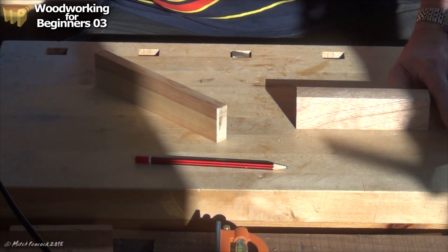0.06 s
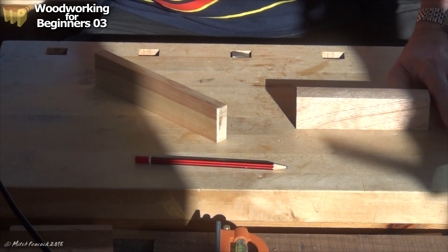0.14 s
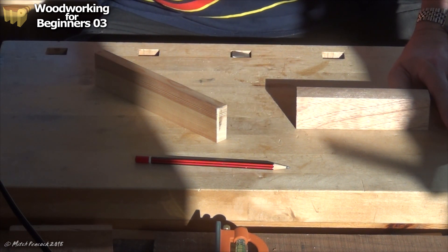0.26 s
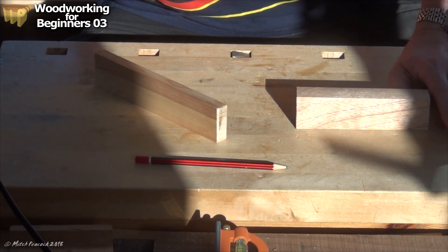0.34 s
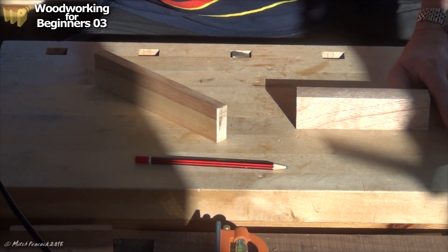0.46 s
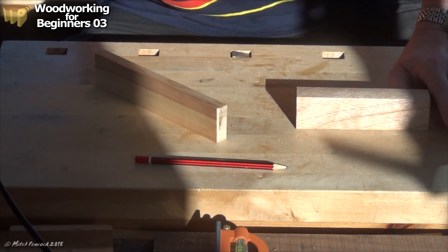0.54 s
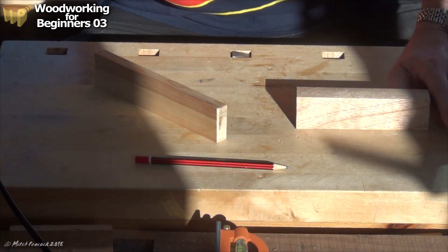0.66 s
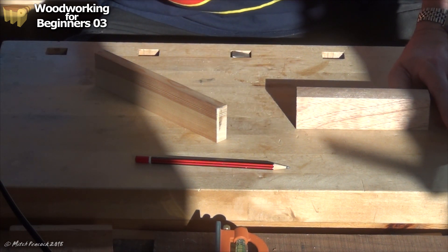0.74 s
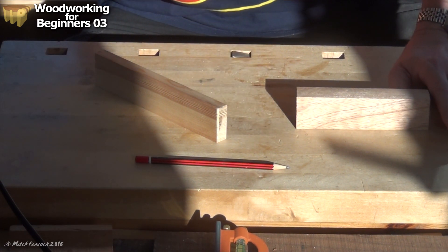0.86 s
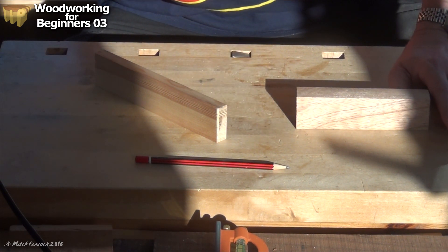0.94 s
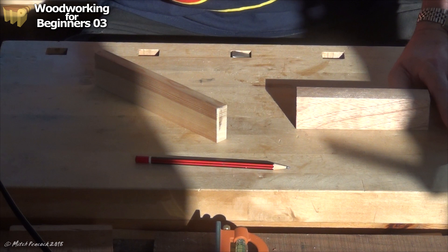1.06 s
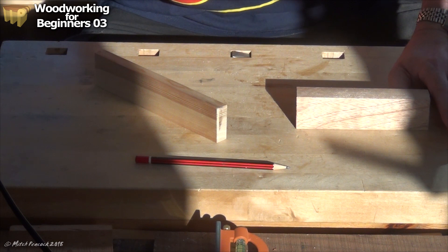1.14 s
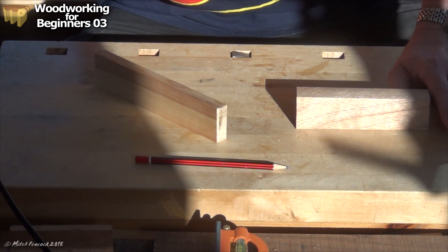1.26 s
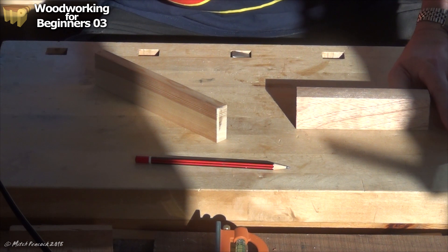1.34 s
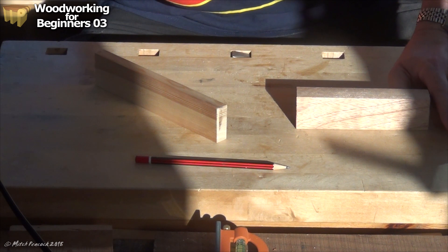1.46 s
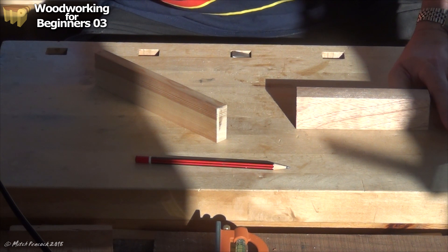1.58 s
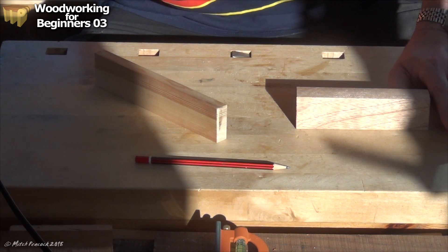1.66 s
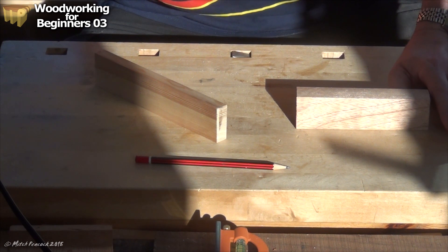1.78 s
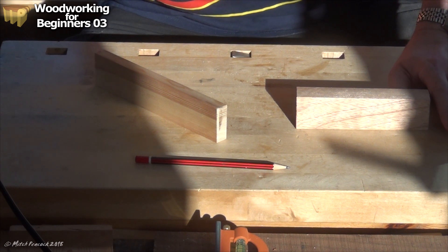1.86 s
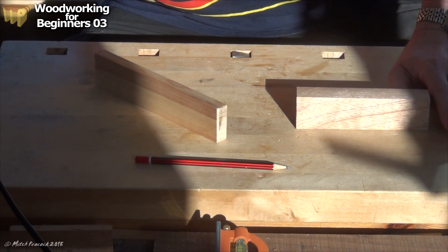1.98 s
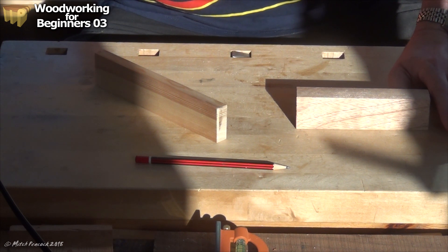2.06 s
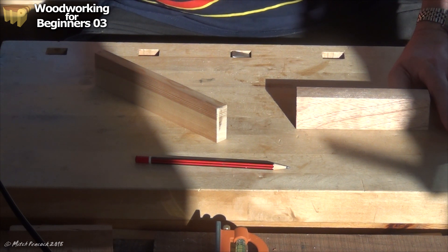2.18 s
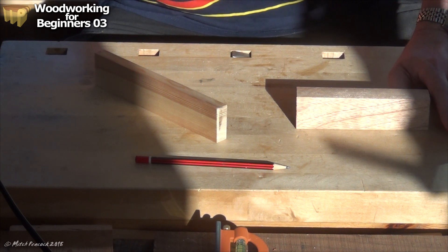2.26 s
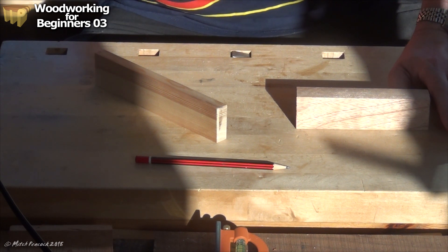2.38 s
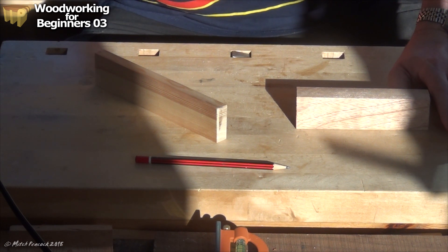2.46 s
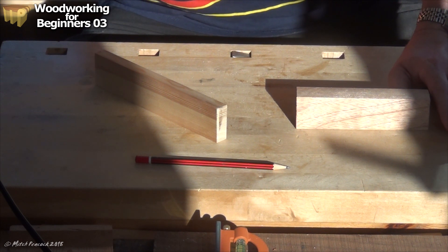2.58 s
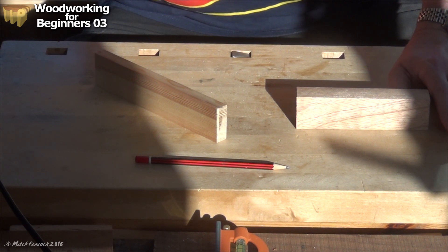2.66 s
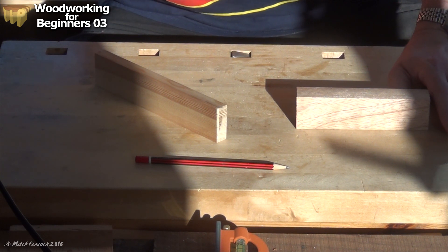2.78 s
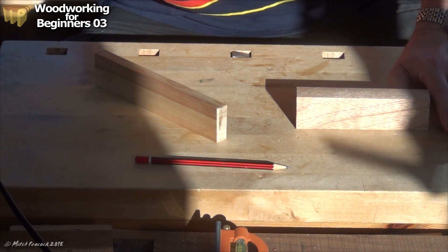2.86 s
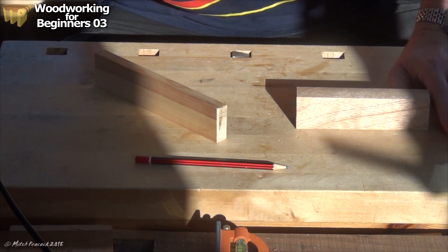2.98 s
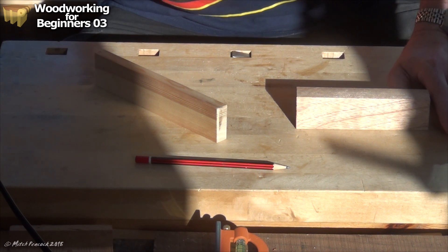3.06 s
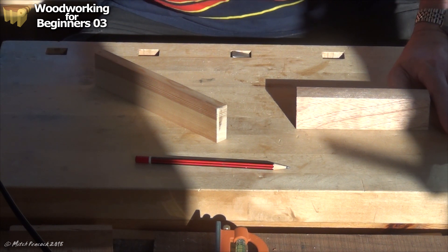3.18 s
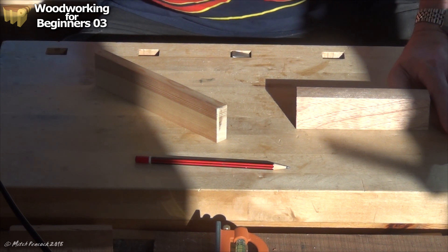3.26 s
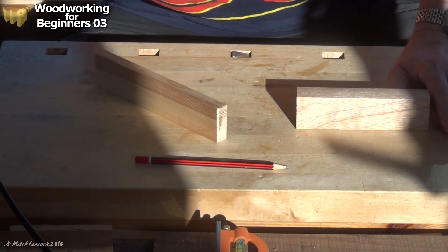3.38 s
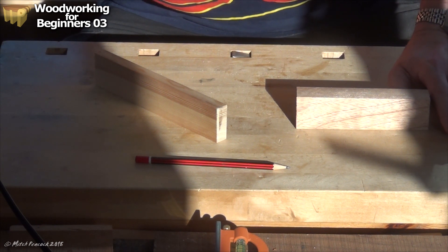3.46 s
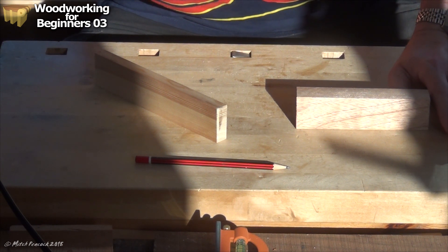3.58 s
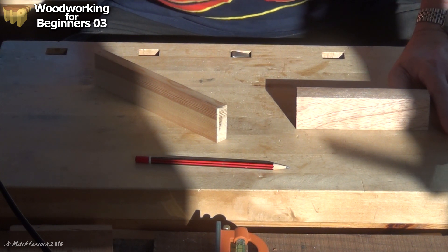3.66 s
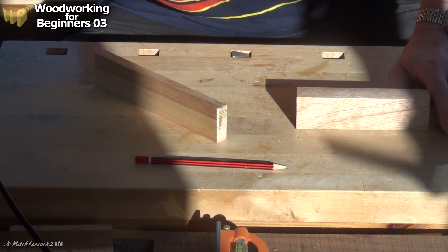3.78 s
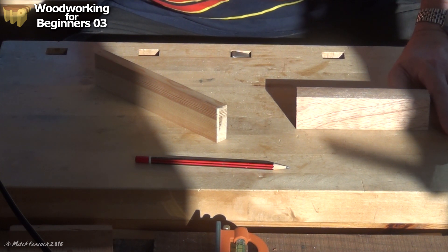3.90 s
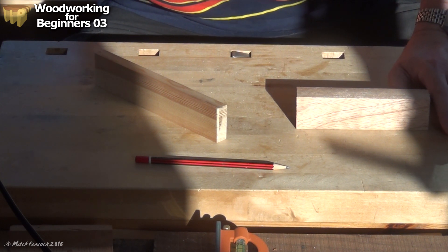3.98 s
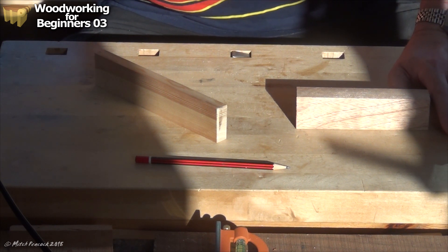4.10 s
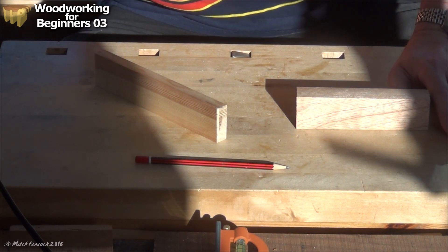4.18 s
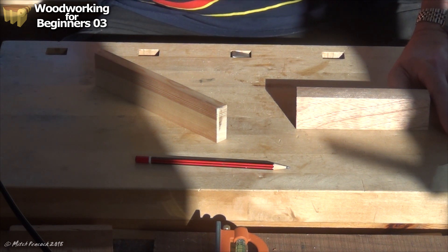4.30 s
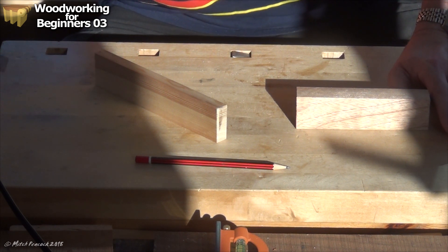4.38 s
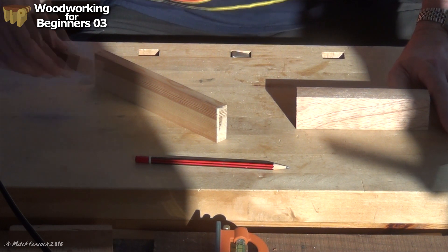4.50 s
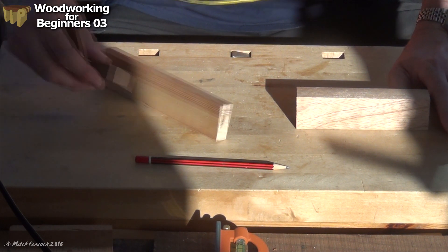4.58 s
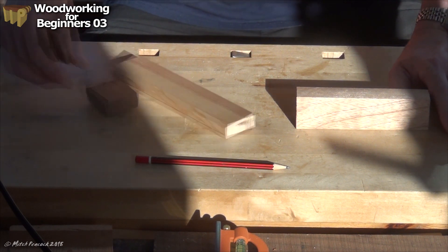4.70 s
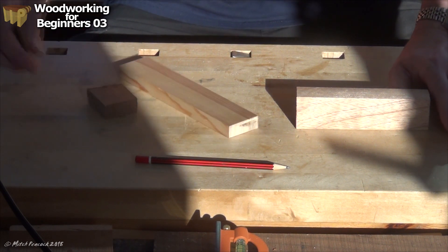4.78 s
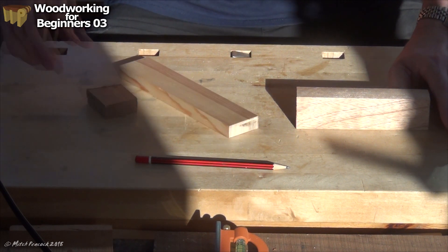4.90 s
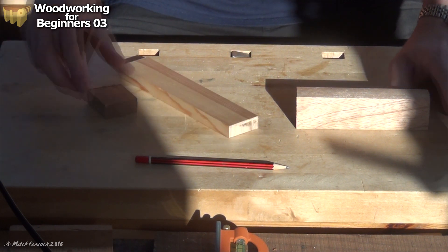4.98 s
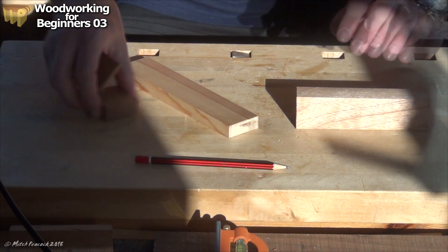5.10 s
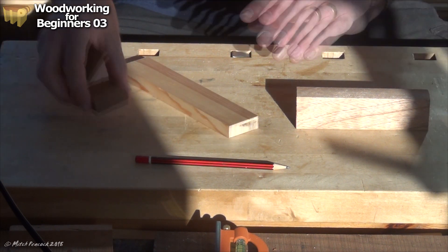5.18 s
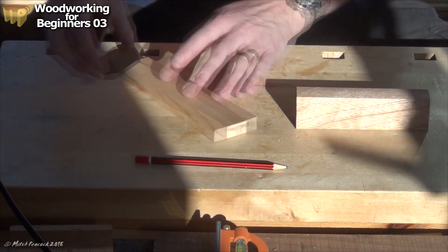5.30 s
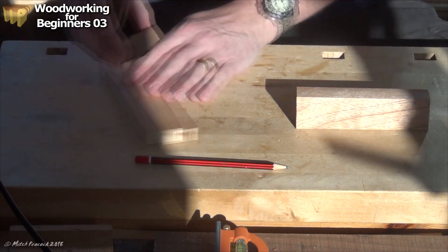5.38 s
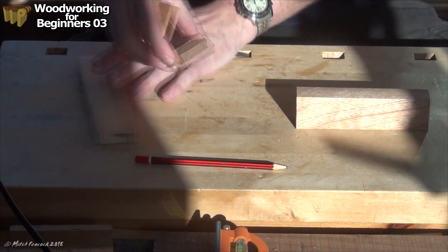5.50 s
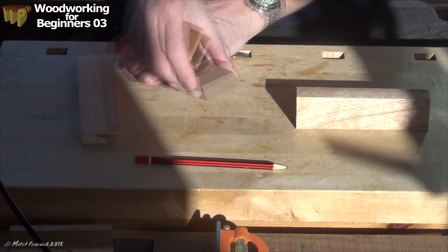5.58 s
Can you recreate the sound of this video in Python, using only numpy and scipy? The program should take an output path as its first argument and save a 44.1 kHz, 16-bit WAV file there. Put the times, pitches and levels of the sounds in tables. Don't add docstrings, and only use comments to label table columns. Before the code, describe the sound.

Quiet low rumble, weak mains hum and slight hiss, with a faint woody ring and brief scrape at the start. From 0.5 s hard little pieces click brightly, a firm tap comes at 0.7, a flat plank lands and bounces at 0.84, a lighter tap at 0.98, and a dull thud with rebound at 1.08. From 1.2 to 3.3 s only dry, papery rustles, thin ticks and a soft high chafing. At 3.4 s a piece drags in stutters, then a loud mid-pitched stick knock at 3.58 with quick rebounds. A soft heavy bump at 4.0. At 4.63 a small hard block cracks and rings; shoves, glancing knocks and a brief squeak lead to a sharp, dense clatter from 4.78 to 4.93, the loudest moment, with lively workshop echoes. From 5.1 low soft bumps, scrapes, rasps and a final tick at 5.5. Near-mono camera microphone, limited peaks.

```python
import sys
import numpy as np
from scipy import signal
from scipy.fft import rfft, irfft, next_fast_len
from scipy.io import wavfile
from scipy.ndimage import uniform_filter1d, minimum_filter1d

SR = 44100
rng = np.random.default_rng(int(sys.argv[2]) if len(sys.argv) > 2 else 0)


def unload_wav(signal):
    wavfile.write(
        sys.argv[1],
        SR,
        np.round(np.clip(np.atleast_2d(signal).T, -1, 1) * 32767).astype(np.int16),
    )


def to_linear_factor(level_db):
    exponent = np.asarray(level_db, float) / 20
    return 10 ** exponent


N = 249120

# hz, level_db
BOARD_CRACK = [(80, -12), (220, -25.5), (350, -5.5), (560, 14), (900, 0), (1500, -4.5), (3500, -23),
               (6000, -41), (16000, -41.5)]
# hz, level_db
ROD_CRACK = [(100, -21.5), (350, 0), (800, 8.5), (1300, 5.5), (2200, 0), (3300, -16.5), (5000, -24),
             (16000, -50)]
# hz, level_db
CHIP_COLOUR = [(150, -12), (330, 3.5), (700, 1), (2000, 2), (3200, 1.5), (4400, 4), (7500, 1), (9800, -6),
               (11500, -13.5), (16000, -30)]
# ratio to pitch, level_db, time to fade 60 dB in s
SOFT_MODES = [(1, 0.5, 0.071), (2.28, -23.5, 0.16)]
# hz, level_db
SOFT_CRACK = [(50, -25.5), (150, -11), (370, 1), (600, 0.5), (1400, -16), (3000, -42), (16000, -28)]
RUB_RISE, RUB_FALL = 590, 166
SLIDE_RISE, SLIDE_FALL = 2100, 410


def unit(x):
    return x / np.sqrt(np.mean(x ** 2) + 1e-20)


def along(points, hz):
    f, v = np.transpose(points)
    return np.interp(np.log(hz + 1), np.log(f + 1), v)


def filtered(x, response):
    m = next_fast_len(len(x) + 8192)
    spectrum = rfft(x, m) * response(np.fft.rfftfreq(m, 1 / SR))
    return irfft(spectrum, m)[:len(x)]


def resonant(x, peaks):
    def response(f):
        total = 0
        for k, (centre, width, db) in enumerate(peaks):
            damping = 1j * f * width
            total = total + (-1) ** k * to_linear_factor(db) * damping / (centre * centre - f * f + damping)
        return total
    return filtered(x, response)


def causal(points, tilt_db, size=2048):
    hz = np.fft.rfftfreq(size, 1 / SR)
    level_db = along(points, hz) + tilt_db * np.log2((hz + 50) / 1000)
    cep = irfft(np.log(to_linear_factor(level_db)))
    cep[1:size // 2] *= 2
    cep[size // 2 + 1:] = 0
    h = irfft(np.exp(rfft(cep)))[:size // 2]
    return h / np.abs(h).max()


def grains(rate, spread_db):
    chance, size = rng.random((2, N))
    happens = chance < rate / SR
    return unit(happens * rng.standard_normal(N) * to_linear_factor(-spread_db * np.log(size + 1e-9)))


def patchy(x, patch_db):
    z = signal.stft(x, nperseg=512)[2]
    field = uniform_filter1d(rng.standard_normal(z.shape), size=8, axis=0)
    field = uniform_filter1d(field, size=10, axis=1)
    return unit(signal.istft(z * to_linear_factor(patch_db * unit(field)), nperseg=512)[1][:N])


def strokes(rows, rise, fall):
    start, held, *cols = np.transpose(rows)[:, :, None]
    t = np.arange(0, N / SR, 0.001)
    early = np.maximum(start - t, 0)
    late = np.maximum(t - start - held, 0)
    return to_linear_factor(-rise * early - fall * late), cols


def summed(gains):
    total = np.sqrt(np.sum(gains ** 2, axis=0))
    return np.interp(np.arange(N) / SR * 1000, np.arange(len(total)), total)


def room(x):
    # hz, time to fade 60 dB in s
    fading = [(200, 0.61), (1000, 0.47), (4000, 0.49), (8000, 0.23), (14000, 0.18)]
    hz, t, z = signal.stft(rng.standard_normal(SR * 3 // 4), SR, nperseg=256)
    tail = signal.istft(z * to_linear_factor(-60 * t / along(fading, hz)[:, None]), SR, nperseg=256)[1]
    t = np.arange(len(tail)) / SR
    tail = tail * (1 - np.exp(-t / 0.0028))
    tail = tail * (1 + 0.3 * np.exp(-t / 0.0022))
    return signal.fftconvolve(x, tail / np.linalg.norm(tail))


def blows(events, modes, crack, knock_db, crack_s, hard_db):
    # hz, width_hz, level_db
    bench = [(123, 54, -12), (224.6, 14, 7.5), (323, 49, 3), (365, 54, 3), (526, 42, 7), (651, 40, 8.5),
             (883, 26, -1)]
    out, t = np.zeros(N + 2 * SR), np.arange(SR // 5) / SR
    knock = resonant(np.exp(-t / 0.00035), bench)
    knock = to_linear_factor(knock_db) * knock / np.abs(knock).max()
    touch = causal(crack, hard_db)
    for s, db, pitch, ring_db, room_db in events:
        ring = sum(to_linear_factor(g - 60 * t / t60) * np.sin(2 * np.pi * pitch * r * t) for r, g, t60 in modes)
        ring = to_linear_factor(ring_db) * ring * (1 - np.exp(-t * pitch / 0.57))
        contact = 0.25 * rng.standard_normal(1024) * to_linear_factor(-60 * t[:1024] / crack_s)
        contact[0] = 1
        burst = np.convolve(contact, touch)
        burst = burst / np.abs(burst).max()
        dry = ring + knock
        spread = dry - 0.6 * ring
        spread[:len(touch)] += touch * np.linalg.norm(burst) / np.linalg.norm(touch)
        dry[:len(burst)] += burst
        wet = to_linear_factor(room_db) * room(spread)
        wet[:len(dry)] += dry
        out[round(s * SR):][:len(wet)] -= to_linear_factor(db - 1.0) * wet
    return out[:N]


def rasp(rows, peaks, mid_hz, fall=RUB_FALL):
    shape, (db,) = strokes(rows, SLIDE_RISE, fall)
    edge = resonant(grains(4010, spread_db=2.0), peaks)
    return summed(shape * to_linear_factor(db)) * unit(resonant(edge, [(mid_hz, 900, 0)]))


def floor():
    # hz, level_db
    noise_colour = [(9, -13), (15, 4), (44, -3), (55, 2), (66, -14.5), (78, -11.5), (200, -19), (450, -25),
                    (700, -28), (3000, -35.5), (10600, -38.5), (15700, -42), (15900, -60)]
    noise = filtered(rng.standard_normal(N), lambda hz: to_linear_factor(along(noise_colour, hz)))
    return to_linear_factor(-44) * unit(noise)


def hum():
    # pitch_hz, rms level_db
    lines = [(50, -52.5), (99, -60)]
    t, out = np.arange(N) / SR, 0
    for hz, db in lines:
        level_db = db + 0.7 * np.sin(2 * np.pi * 1.35 * t + hz)
        out = out + np.sqrt(2) * to_linear_factor(level_db) * np.sin(2 * np.pi * hz * t)
    return out


def faint_rings():
    # start_s, peak_db, pitch_hz, ring_db, room_db
    events = [
        (0.0, -72, 1238, 25.5, -1),
        (.14, -80, 1230, 18, -6),
        (1.96, -83, 1600, 24, -6),
        (2.14, -79, 1370, 23, -6),
        (5.415, -62.5, 840, 25, -10),
    ]
    # ratio to pitch, level_db, time to fade 60 dB in s
    modes = [(1, 2, .2), (.925, -3, .08), (1.17, -9, .25)]
    return blows(events, modes, ROD_CRACK, knock_db=-30, crack_s=0.01, hard_db=0)


def drag():
    # full_from_s, held_s, bench rumble_db, scrape_db
    slides = [
        (.001, 0.065, -76, -45.5),
        (.14, 0.012, -63, -52),
        (3.39, 0.021, -44, -32.5),
        (3.44, 0.079, -45.5, -30),
        (3.495, 0.14, -41.5, -40),
        (4.675, 0.024, -26.5, -25),
        (4.736, 0.035, -24.5, -24),
        (5.09, 0.075, -47.5, -40),
        (5.372, 0.13, -32.5, -36),
        (5.64, .015, -48, -60),
    ]
    # hz, width_hz, level_db
    board = [(335, 20, 1), (371, 67, -2.5), (569, 72, -8), (815, 32, -2)]
    # hz, level_db
    scrape_colour = [(530, -0.5), (900, 7), (959, 0), (1180, 6.5), (1430, 1.5), (2600, -10), (3600, -22),
                     (6000, -16), (7800, -57), (13200, -120)]
    shape, (rumble_db, scrape_db) = strokes(slides, SLIDE_RISE, SLIDE_FALL)
    shaking = resonant(grains(1500, spread_db=-0.1), board)
    rumble = unit(resonant(shaking, [(388, 230, 0)]))
    scrape = unit(filtered(grains(5000, spread_db=1.5), lambda hz: to_linear_factor(along(scrape_colour, hz))))
    dry = summed(shape * to_linear_factor(rumble_db - 0.5)) * rumble + summed(shape * to_linear_factor(scrape_db - 7)) * scrape
    return dry + to_linear_factor(-7.5) * room(dry)[:N]


def thuds():
    # start_s, peak_db, pitch_hz, ring_db, room_db
    events = [
        (1.077, -16, 506, 0.5, 1),
        (1.0925, -22, 470, 9.5, -8),
        (1.169, -32.5, 580, -12, 7.5),
        (4.689, -20, 542, -9, 8.5),
        (0.051, -50.5, 514, 11, -10),
    ]
    # ratio to pitch, level_db, time to fade 60 dB in s
    modes = [(1.022, -2, 0.091), (1.327, -1.5, 0.033), (0.6, -24, 0.076)]
    return blows(events, modes, BOARD_CRACK, knock_db=-5.5, crack_s=0.01, hard_db=0.9)


def ticks():
    # start_s, peak_db, ring_hz
    touches = [(0.518, -36, 8600), (0.53, -21, 7500), (0.531, -19, 5800), (.673, -23, 4200),
               (.6735, -28, 7400), (0.701, -17, 6500), (0.7013, -17, 8320), (.838, -33, 7300),
               (0.9358, -31, 7900), (.978, -26, 6100), (2.469, -37, 5570), (2.4997, -35, 5330),
               (2.507, -37, 12800), (2.582, -40, 8200), (2.7294, -42, 5900), (2.909, -31, 5950),
               (2.945, -31, 14200), (3.3278, -37, 7600), (3.4405, -29, 7760), (3.5095, -28, 7260),
               (3.5826, -23, 5940), (4.2844, -60, 8740), (4.699, -29, 5800), (4.734, -25, 8040),
               (4.745, -36, 5900), (4.75, -36, 13200), (4.7625, -16.5, 8900), (4.772, -33, 9000),
               (5.1063, -38, 8860), (5.1283, -28, 12600), (5.2864, -40, 9020), (5.3622, -41, 8400),
               (5.5032, -25, 7000)]
    out, t = np.zeros(N + 2 * SR), np.arange(SR // 20) / SR
    for s, db, hz in touches:
        touch = rng.standard_normal(len(t)) * to_linear_factor(-60 * t / 0.017)
        ring = resonant(touch, [(hz, 450, 0)])
        dry = 0.26 * np.gradient(touch) + ring / np.abs(ring).max()
        wet = to_linear_factor(-10.5) * room(dry)
        wet[:len(dry)] += dry
        out[round(s * SR):][:len(wet)] += to_linear_factor(db - 2) * wet
    return out[:N]


def clicks():
    # start_s, peak_db, pitch_hz, ring_db, room_db
    events = [
        (0.53, -21, 2204, -2.5, 4.1),
        (0.673, -20.5, 2155, -8, 1),
    ]
    # ratio to pitch, level_db, time to fade 60 dB in s
    modes = [(1, 1.5, 0.037), (1.004, -11.5, 0.28), (.66, -8.5, 0.085), (.542, -12, 0.086),
             (0.338, -10.5, 0.051), (1.18, -9, 0.064), (1.4, -15, 0.078), (1.5, -20, 0.046),
             (2.567, -19, 0.25), (3, -14.5, 0.17), (3.1, -29, .25)]
    # hz, level_db
    crack = [(150, -29), (500, -13), (1000, 13), (2200, 10), (3200, 7), (4500, -1), (5800, -21), (8000, -8),
             (10000, -42), (16000, -26)]
    return blows(events, modes, crack, knock_db=-22.0, crack_s=0.011, hard_db=5.0)


def rustle():
    # full_from_s, held_s, level_db, brightness 0-1, edge_db above the rub
    stirs = [(1.222, 0.034, -44, 0.17, -2), (1.431, 0.031, -44, 0.48, 1.5), (1.61, 0.017, -47, 0.44, -1),
             (1.805, 0.049, -53, 0.4, -4), (1.885, 0.019, -51.5, 0.45, 0.5), (2.04, 0.1, -53.5, 0.6, -3.5),
             (2.24, 0.01, -55, 0.5, -2), (2.305, 0.047, -48.5, 0.92, -6), (2.43, 0.055, -45.5, 0.5, -2),
             (2.555, 0.013, -45.5, 0.06, -6), (2.715, 0.021, -47.5, 0.23, -6),
             (2.881, 0.038, -43, 0.54, -6), (3.275, 0.034, -53.5, 0.1, -14), (3.385, 0.011, -51, 0.2, -10),
             (4.28, 0.0086, -62, 1, 4), (5.285, 0.014, -64.5, .45, 4)]
    # full_from_s, held_s, level_db, edge_db and face_db above the rub
    shifts = [(.54, 0.017, -56.5, -26, 22), (0.675, 0.024, -41, -12, 12), (.74, 0.14, -51.5, -21, 15),
              (.935, 0.028, -48, -2.5, 11), (0.973, 0.032, -41, -3, 11), (1.095, 0.017, -43.5, -8.5, 16.5),
              (2.5, 0.027, -68, -10, 22), (2.9, 0.067, -65.5, -10, 20), (3.441, 0.086, -46, -3, 11.5),
              (3.6, 0.05, -51.5, -15, 16), (4.023, 0.065, -50, -7, 12), (4.15, .03, -66, 2, -2),
              (5.1, 0.034, -49.5, -5, 12), (5.376, 0.095, -48.5, -3, 11.5), (5.497, 0.021, -44.5, -3.5, 5)]
    # hz, width_hz, level_db
    dull = [(5740, 680, 0.5), (6200, 180, 7.5), (6650, 1130, 2)]
    # hz, width_hz, level_db
    shiny = [(7600, 460, 3.5), (8410, 560, 3.5), (8860, 630, 0.5)]
    # hz, width_hz, level_db
    thin = [(11600, 5000, 8), (13160, 1200, 13), (13970, 1200, 8)]
    # hz, width_hz, level_db
    broad = [(2390, 1070, 15), (4200, 140, 10)]
    rows = [(*row, -6) for row in stirs]
    rows += [(s, held, db, 0.35, edge, face) for s, held, db, edge, face in shifts]
    shape, (db, bright, edge_db, face_db) = strokes(rows, RUB_RISE, RUB_FALL)
    gain = shape * to_linear_factor(db)

    def rub(peaks):
        return patchy(resonant(grains(15000, spread_db=1.4), peaks), patch_db=3)

    dry = summed(gain * np.sqrt(1 - bright)) * rub(dull)
    dry = dry + summed(gain * np.sqrt(bright)) * rub(shiny)
    edge = unit(resonant(rub(thin), [(12900, 15800, 0)]))
    face = unit(resonant(rub(broad), [(2960, 12000, 0)]))
    dry = dry + summed(gain * to_linear_factor(edge_db)) * edge + summed(gain * to_linear_factor(face_db - 13.0)) * face
    return dry + to_linear_factor(-7.5) * room(dry)[:N]


def taps():
    # start_s, peak_db, pitch_hz, ring_db, room_db
    events = [
        (0.7008, -8.5, 1046, -12, -2),
        (0.9775, -21.5, 1980, -7, 2.5),
    ]
    # ratio to pitch, level_db, time to fade 60 dB in s
    modes = [(1.01, 3.5, 0.028), (0.786, -7, 0.048), (3.4, -19, .05)]
    # hz, level_db
    crack = [(150, -49), (500, -7), (1100, 9.5), (2200, -5), (3100, -2.5), (3700, -18), (4500, -8),
             (5400, -23), (7500, -9), (10000, -23), (16000, -26)]
    return blows(events, modes, crack, knock_db=-20.5, crack_s=0.013, hard_db=2.0)


def planks():
    # start_s, peak_db, pitch_hz, ring_db, room_db
    events = [
        (0.835, -15.5, 510, -5.5, 1),
        (.8455, -19.5, 514, -11, 0.15),
        (.861, -25.5, 394, -5, 0),
        (3.385, -24, 604, -3.5, 0.11),
    ]
    # ratio to pitch, level_db, time to fade 60 dB in s
    modes = [(1, 0.5, 0.052), (1, -1, 0.11), (1.4, 2.5, 0.05), (1.9, -6.5, 0.09), (0.456, -1.5, 0.071),
             (3.6, -29, .08), (4.9, -29, 0.09)]
    return blows(events, modes, BOARD_CRACK, knock_db=-5.5, crack_s=0.0071, hard_db=3.5)


def palms():
    # start_s, peak_db, pitch_hz, ring_db, room_db
    events = [
        (.965, -33.5, 142, 0, 6),
        (1.24, -34.5, 150, 0, 0),
        (3.9965, -20.5, 222, 0.92, -1.5),
        (5.12, -31, 140, 0.17, -8),
        (5.172, -29.5, 133, 0.19, -4),
        (5.195, -34, 134, -0.6, -7),
        (5.384, -26.5, 210, 1.8, -3),
    ]
    return blows(events, SOFT_MODES, SOFT_CRACK, knock_db=-21, crack_s=0.0051, hard_db=-12.5)


def edge_rasps():
    # full_from_s, held_s, level_db
    rows = [
        (.985, 0.038, -49.5),
        (1.1, .04, -55),
        (3.44, .06, -50),
        (5.372, 0.032, -47.5),
        (5.43, 0.063, -48.5),
        (5.55, .08, -63),
    ]
    # hz, width_hz, level_db
    peaks = [(3920, 92, 1), (4360, 270, -2.5)]
    return rasp(rows, peaks, mid_hz=4200)


def chafes():
    # full_from_s, held_s, level_db
    rows = [
        (1.25, 0.073, -59),
        (2.54, 0.12, -57),
        (2.72, 0.057, -58),
        (2.89, 0.069, -51),
        (3.2, 0.12, -65.5),
    ]
    # hz, width_hz, level_db
    peaks = [(5730, 130, 0)]
    return rasp(rows, peaks, mid_hz=5900)


def bumps():
    # start_s, peak_db, pitch_hz, ring_db, room_db
    events = [(3.373, -31, 410, -20, 5), (3.386, -41, 895, 11, -8), (3.503, -33, 286, 6, 9),
              (3.9965, -18.5, 371, -0.5, 1.5), (3.998, -26, 473, 6, -3), (4.069, -30, 327, -3, -9),
              (5.112, -36, 338, 12, -3), (5.374, -32.5, 374, 10.5, -3), (5.391, -32.5, 390, 11.5, -11),
              (5.417, -28.5, 395, 10, -18), (5.441, -29, 360, 12, -4.5), (5.459, -30, 371, 12.5, -13),
              (5.477, -40, 365, -1, -7), (5.497, -28.5, 363, 9.5, 0), (5.531, -36, 325, 9.5, 6.5),
              (5.59, -42, 343, 9.5, 5)]
    return blows(events, SOFT_MODES, SOFT_CRACK, knock_db=-28, crack_s=0.021, hard_db=-1.9)


def sticks():
    # start_s, peak_db, pitch_hz, ring_db, room_db
    events = [
        (3.5803, -5, 1212, -2, -0.26),
        (3.5846, -12.5, 1220, -8, -1.7),
        (3.6078, -17, 1190, -17, -2.6),
        (5.369, -35, 1280, 3, -0.4),
    ]
    # ratio to pitch, level_db, time to fade 60 dB in s
    modes = [(1, -0.5, 0.08), (1.265, -12, 0.17), (.693, -8, 0.1), (0.479, -4.5, 0.074), (0.556, -27, .07),
             (0.305, -6, 0.11), (1.4, -26, .1), (2.2, -27, 0.1), (2.5, -31, 0.062)]
    return blows(events, modes, ROD_CRACK, knock_db=-15.0, crack_s=0.015, hard_db=2.8)


def small_block():
    # start_s, peak_db, pitch_hz, ring_db, room_db
    events = [
        (4.627, -0.5, 2125, -11.5, -1),
    ]
    # ratio to pitch, level_db, time to fade 60 dB in s
    modes = [(1, 6.5, 0.12), (1.005, -5, 0.27), (3.3, -27, 0.1), (2.073, -14.5, 0.45), (2.2, -30, .3),
             (3.157, -25, 0.21), (2.1, -14, 0.17), (3.585, -28, 0.43), (5.2, -35, 0.06),
             (4.41, -32.5, 0.24), (5.59, -44, .1), (0.21, -11.5, 0.11)]
    # hz, level_db
    crack = [(100, -57), (400, -16.5), (850, -8.5), (1600, 2.5), (2700, -6.5), (3500, -17), (4400, -2.5),
             (5400, -22.5), (9000, -15.5), (16000, -27)]
    return blows(events, modes, crack, knock_db=-19.0, crack_s=0.0092, hard_db=-3.0)


def chips():
    # start_s, peak_db, pitch_hz, ring_db, room_db
    events = [
        (4.627, -11, 4400, -33, -23),
        (4.8422, 6, 4470, -28, -3),
        (4.8478, 7, 4200, -39, 2),
    ]
    # ratio to pitch, level_db, time to fade 60 dB in s
    modes = [(1, -4, .15), (1.545, -3, .1), (1.765, 0, .12)]
    return blows(events, modes, CHIP_COLOUR, knock_db=-39.5, crack_s=0.0021, hard_db=-1.0)


def squeaks():
    # full_from_s, held_s, level_db
    rows = [
        (4.64, 0.099, -49.5),
        (4.763, .012, -44),
        (5.108, .01, -50),
        (5.125, 0.007, -41),
    ]
    # hz, width_hz, level_db
    peaks = [(8650, 450, -2), (9100, 350, 0)]
    return rasp(rows, peaks, mid_hz=9100, fall=340)


def glances():
    # start_s, peak_db, pitch_hz, ring_db, room_db
    events = [
        (4.7342, -6, 1230, -20, -1.5),
        (4.7398, -15, 1900, -12, 0),
        (4.748, -8, 897, -1, 0),
        (4.7622, -10, 2060, -2, -9),
    ]
    # ratio to pitch, level_db, time to fade 60 dB in s
    modes = [(1, 4, 0.0075), (0.41, -6, 0.028)]
    return blows(events, modes, ROD_CRACK, knock_db=-15.0, crack_s=0.0079, hard_db=4.5)


def snaps():
    # start_s, peak_db, pitch_hz, ring_db, room_db
    events = [
        (4.7775, 5, 7650, -23, -12),
        (4.7783, 3, 7650, -23, -12),
    ]
    # ratio to pitch, level_db, time to fade 60 dB in s
    modes = [(1, 0, .1), (.876, -5, .06)]
    # hz, level_db
    crack = [(500, -40), (3000, -22), (4300, -3), (6300, 3), (8000, -3), (10500, -9), (12500, -17),
             (16000, -19)]
    return blows(events, modes, crack, knock_db=-48, crack_s=0.005, hard_db=0)


def clatter():
    # full_from_s, held_s, level_db
    slumps = [
        (4.784, 0.034, -11),
        (4.838, 0.007, -29),
        (4.874, 0.0083, -14),
    ]
    # start_s, peak_db
    spikes = [(4.7853, -9), (4.7854, 0), (4.7943, 5), (4.798, -2), (4.8035, -15), (4.8092, 9), (4.8141, -5),
              (4.82, -12), (4.8272, 5), (4.8382, -4), (4.8453, -11), (4.8645, -18), (4.8745, -24),
              (4.878, -3), (4.8826, -18), (4.8893, -10), (4.903, -17), (4.917, -11), (4.9203, -20),
              (4.9302, -8)]
    # hz, width_hz, level_db
    peaks = [(328, 30, -8), (1740, 40, -7), (2135, 50, -7), (3100, 130, -11), (4335, 80, 1),
             (5510, 90, -16), (6705, 100, 1), (7660, 140, 1), (9490, 160, -9)]
    shape, (db,) = strokes(slumps, rise=2500, fall=170)
    hits = summed(shape * to_linear_factor(db - 4)) * grains(8000, spread_db=1.1)
    colour = causal(CHIP_COLOUR, tilt_db=-0.8)
    s, peak_db = np.transpose(spikes)
    hits[np.round(s * SR).astype(int)] = -to_linear_factor(peak_db - 3.5) * np.linalg.norm(colour)
    broad = np.convolve(hits, colour / np.linalg.norm(colour))[:N]
    dry = broad + to_linear_factor(7) * sum(resonant(broad, [peak]) for peak in peaks)
    return dry + to_linear_factor(-4.5) * room(dry)[:N]


def scene():
    # hz, level_db
    side_colour = [(30, -63), (200, -44), (400, -27), (800, -24), (1500, -20), (5000, -14), (14000, -13)]
    mid = floor() + hum() + faint_rings() + drag() + thuds()
    mid = mid + ticks() + clicks() + rustle() + taps() + planks() + palms()
    mid = mid + edge_rasps() + chafes() + bumps() + sticks()
    mid = mid + small_block() + chips() + squeaks() + glances() + snaps() + clatter()
    side = filtered(floor(), lambda hz: to_linear_factor(along(side_colour, hz)))
    return np.array([mid + side, mid - side])


def roll_off(x):
    return signal.sosfilt(signal.butter(12, 16520, fs=SR, output="sos"), x)


def record(dry):
    dry = np.array([filtered(c, lambda hz: 1 / np.sqrt(1 + (hz / 15800) ** 500)) for c in dry])
    peak = np.abs(dry).max(axis=0)
    needed = np.minimum(1, 0.98 / (peak + 1e-9))
    gain = uniform_filter1d(minimum_filter1d(needed, size=41), size=21)
    drive = np.clip(uniform_filter1d(peak, size=3000) - 0.085, 0, 1)
    wander = unit(filtered(rng.standard_normal(N), lambda hz: 1 / (1 + (hz / 70) ** 2)))
    upset = to_linear_factor(-28) * drive * wander
    return roll_off(dry * gain + [upset, -upset])


dry = scene()
out = record(dry)
unload_wav(out)
```